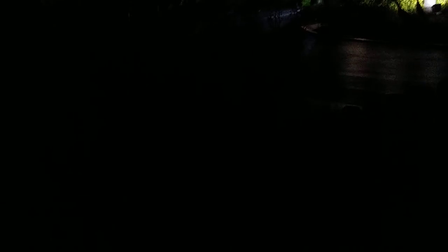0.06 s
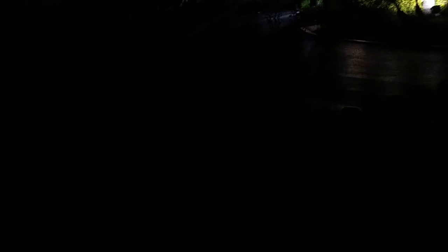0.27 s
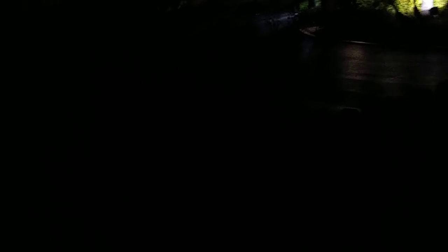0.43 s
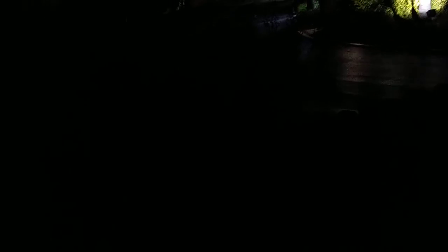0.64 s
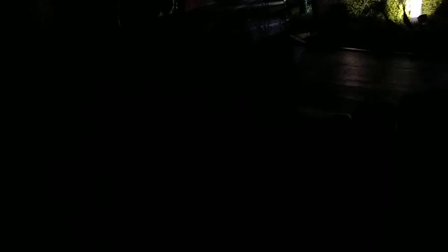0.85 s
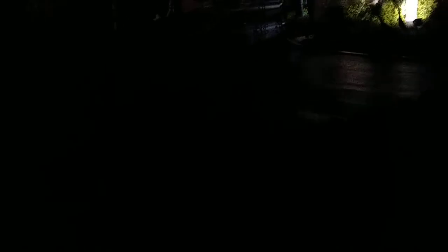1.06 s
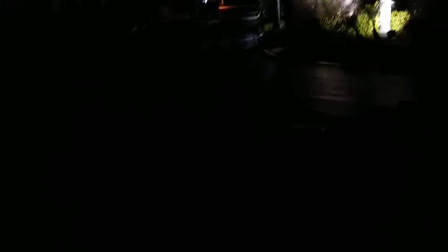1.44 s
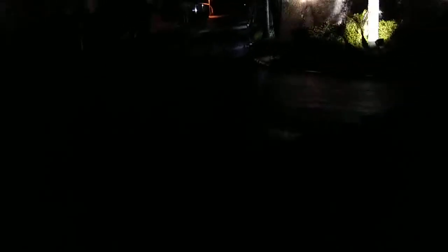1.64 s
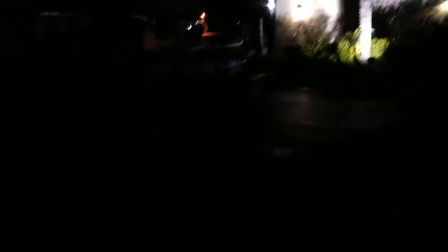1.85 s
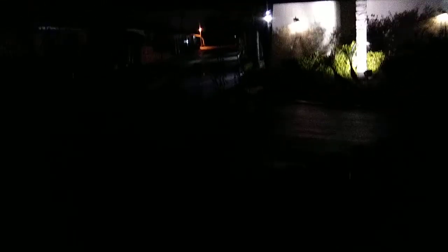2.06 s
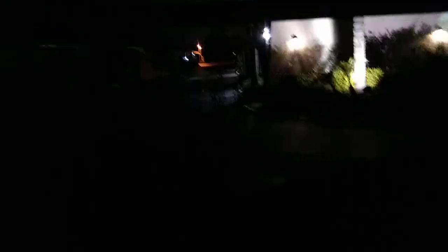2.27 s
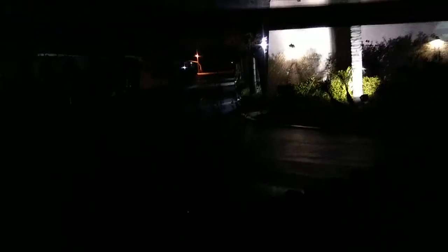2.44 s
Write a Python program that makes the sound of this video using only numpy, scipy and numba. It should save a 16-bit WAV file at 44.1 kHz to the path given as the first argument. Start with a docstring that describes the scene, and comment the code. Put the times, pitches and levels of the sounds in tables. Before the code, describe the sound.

Fighting raccoons let out two rough screeches and a higher, hissing shriek, while softer snarls and a low growl carry on around them. Faint rustling and a short echo sit in quiet night air, ending with brief microphone handling.

```python
"""Two hoarse screeches and a longer, brighter shriek: raccoons fighting outdoors at night. Quieter
snarls and breathy rasps fall around them, over a low pulsing growl. Each cry is uneven vocal-fold pulses
and air ringing the throat and mouth; the growl is slow pulses ringing the chest. Scuffling rustles, and
near the end a hand clicks and rubs the camera. Nearby surfaces add a short echo over faint night air."""
import sys
import numpy as np
from scipy import signal
from scipy.fft import rfft, irfft
from scipy.io import wavfile
from scipy.ndimage import uniform_filter1d
from numba import njit

SR = 44100
rng = np.random.default_rng(int(sys.argv[2]) if len(sys.argv) > 2 else 0)


def generate_wav(signal):
    """Clip the signal to [-1, 1] and save it as 16-bit WAV at the path in sys.argv[1]."""
    frames = np.transpose(np.atleast_2d(signal))
    scaled = np.clip(frames, -1, 1) * 32767
    pcm = np.round(scaled).astype(np.int16)
    wavfile.write(sys.argv[1], SR, pcm)


N = 114660

# upper mouth resonances of snarls and rasps: freq_hz, gain_db
BREATHY_TOP = [(1200, -6.5), (2100, 0.5), (2600, 3), (3500, 3), (4200, -7), (5500, -8), (7500, -33),
               (15500, -43)]


def screeches():
    """Loud, high, hoarse cries, focused on the throat resonance."""
    # one contour per screech: time_s, throat_db, upper_db, throat_hz
    contours = [
        [(.15, -51, -50, 1160), (.178, -41.5, -52, 1303), (.194, -37, -46, 1329), (.201, -30, -42.5, 1349),
         (.23, -31.5, -32.5, 1417), (.244, -29.5, -35, 1449), (.264, -30, -29.5, 1469), (.29, -30.5, -33, 1454),
         (.308, -28, -30.5, 1402), (.338, -34, -48.5, 1250), (.352, -47.5, -58, 1200), (.39, -51, -57, 1190)],
        [(.678, -57, -46, 1431), (.683, -58, -52, 1430), (.688, -29, -38.5, 1417), (.698, -34, -55, 1405),
         (.706, -29.5, -31, 1409), (.731, -24, -34, 1453), (.745, -35, -37, 1458), (.752, -26, -29.5, 1477),
         (.776, -26, -34.5, 1502), (.791, -22.5, -26.5, 1495), (.806, -23.5, -34.5, 1436),
         (.83, -31, -51, 1372), (.86, -57, -44, 1283)],
    ]
    # mouth EQ, body and top: freq_hz, gain_db
    body = [(200, -42), (480, -31), (750, -5.5), (920, -11), (1080, -4), (1230, -10.5), (1450, -1),
            (1680, -1), (1850, -4.5), (2200, -8.5), (2600, -20.5), (4000, -50)]
    top = [(1200, -40), (2100, -3), (2600, 3), (2900, -2), (3200, 1.5), (3520, 4), (3900, -2), (4400, -10),
           (5100, -8.5), (5600, -15.5), (6200, -15.5), (8000, -36), (11000, -37), (15500, -42)]
    return cry(contours, body, top, pitch_hz=478.2, jitter=.14, air=.85, rattle_hz=60.7, rattle_db=1.5,
               width_hz=330, ring_db=-4.5, body_db=2, upper_db=1.3, palate_db=-5)


def shriek():
    """Higher and brighter, mouth wide open; the throat resonance arches up and sinks as it closes."""
    # time_s, throat_db, upper_db, throat_hz
    contour = [(1.645, -65, -71, 1449), (1.66, -45, -42.5, 1451), (1.673, -33.5, -31.5, 1447),
               (1.681, -37, -20.5, 1447), (1.692, -25, -21, 1447), (1.701, -32.5, -35, 1448),
               (1.712, -26, -31, 1431), (1.738, -33, -25, 1501), (1.76, -32.5, -33.5, 1665),
               (1.805, -31, -28, 1677), (1.86, -28.5, -23, 1558), (1.898, -26.5, -20, 1505),
               (1.91, -26, -26, 1402), (1.932, -28, -31, 1299), (1.956, -35, -49, 1197),
               (1.98, -45, -61, 1148)]
    # mouth EQ, body and top: freq_hz, gain_db
    body = [(200, -32), (600, -21.5), (900, -13.5), (1150, -7), (1450, -7.5), (1900, 8.5), (2300, -11),
            (2700, -13), (4000, -45.5)]
    top = [(1200, -28), (2150, -4.5), (2600, 4), (2830, -2.5), (3150, 2), (3500, 1), (3950, -2),
           (4400, -14), (5000, -14.5), (5700, -20.5), (6500, -39), (8500, -28), (12000, -35.5),
           (15500, -55)]
    return cry([contour], body, top, pitch_hz=598.6, jitter=.16, air=.87, rattle_hz=70, rattle_db=0,
               width_hz=580, ring_db=-2, body_db=3, upper_db=3, palate_db=-4)


def rasps():
    """Mostly air through a broad throat resonance, rough and spitting."""
    # one contour per rasp: time_s, throat_db, upper_db, throat_hz
    contours = [
        [(0.0, -35.5, -39, 1373), (0.03, -45.5, -50, 1429), (0.048, -46, -48.5, 1426),
         (0.054, -50, -51.5, 1413), (0.078, -40, -47, 1359), (0.104, -40.5, -46, 1301), (0.128, -48, -52, 1182),
         (0.136, -50, -48, 1130), (0.15, -50, -53, 1103)],
        [(0.83, -37.5, -56, 1271), (0.878, -41, -43.5, 1167), (0.902, -38, -37, 1183), (0.94, -37, -35.5, 1302),
         (0.954, -47, -47, 1259), (0.99, -46.5, -37, 1293), (1.022, -48, -44.5, 1319), (1.08, -44, -41.5, 1290),
         (1.115, -33.5, -35.5, 1259), (1.148, -31.5, -32.5, 1230), (1.172, -44.5, -45.5, 1160),
         (1.2, -42.5, -42.5, 1312), (1.25, -63, -62, 1287)],
    ]
    # mouth EQ: freq_hz, gain_db
    body = [(200, -24), (480, -5), (720, 1), (900, -1.5), (1100, -5.5), (1450, 2.5), (2200, -4),
            (2700, -19), (4000, -34.5)]
    return cry(contours, body, BREATHY_TOP, pitch_hz=188.7, jitter=.3, air=2.8, rattle_hz=65,
               rattle_db=1.4, width_hz=900, ring_db=-5.5, body_db=1, upper_db=0, palate_db=-14)


def snarls():
    """Quieter, lower cries with the mouth half shut."""
    # one contour per snarl: time_s, throat_db, upper_db, throat_hz
    contours = [
        [(0.4, -53, -61, 825.7), (0.452, -39, -56, 853.2), (0.486, -38.5, -46.5, 870),
         (0.524, -36.5, -55, 833.6), (0.592, -35, -56.5, 787.1), (0.66, -48.5, -39, 775.8),
         (0.678, -41.5, -57, 892.5), (0.69, -45, -44, 912.7)],
        [(1.24, -60, -59, 705.4), (1.286, -46.5, -49.5, 721.3), (1.344, -51.5, -47.5, 712.4),
         (1.422, -40, -57.5, 770), (1.458, -48, -53, 738.4), (1.464, -48, -67, 742.6),
         (1.476, -43.5, -64.5, 725.6), (1.58, -64, -65, 758.3)],
        [(1.96, -42, -44, 1047), (2.066, -39, -50, 1060), (2.112, -39, -47, 984.7), (2.142, -42.5, -48.5, 1011),
         (2.216, -34.5, -46.5, 1039), (2.254, -43, -54, 956.8), (2.28, -56, -60, 853.8),
         (2.29, -61, -45, 861.5)],
        [(2.32, -46, -47, 751), (2.366, -44.5, -40, 756.5), (2.4, -41.5, -49, 746.4), (2.424, -42, -43, 751),
         (2.432, -39, -60, 764.4), (2.45, -39, -48.5, 786), (2.504, -41.5, -57, 777.8), (2.59, -62, -47, 745.2)],
    ]
    # mouth EQ: freq_hz, gain_db
    body = [(150, -18), (400, -5.5), (700, -1.5), (1000, -4), (1250, -3.5), (1550, 2), (1900, -6.5),
            (2600, -20.5), (4000, -40)]
    return cry(contours, body, BREATHY_TOP, pitch_hz=150.6, jitter=.3, air=2.8, rattle_hz=52.2,
               rattle_db=1.1, width_hz=400, ring_db=-3.5, body_db=-.3, upper_db=2.2, palate_db=-14)


def cry(contours, body, top, pitch_hz, jitter, air, rattle_hz, rattle_db,
        width_hz, ring_db, body_db, upper_db, palate_db):
    """Pulses and air, shaken by a rattle, ring the moving throat and palate and the fixed mouth EQ."""
    throat_gain, upper_gain, throat_hz = effort(contours)
    pulses, puffs = vocal_folds(pitch_hz * throat_hz / np.mean(throat_hz), jitter)
    rattle = np.sin(phase_of(rattle_hz * np.exp(.27 * wander(43))))
    source = (pulses + air * puffs) * undb(rattle_db * rattle)
    ring = cavity(source, throat_hz, width_hz)
    # the palate resonance loosely follows the throat
    throat_ratio = throat_hz / np.average(throat_hz, weights=upper_gain)
    palate_hz = 3400 * throat_ratio ** .3 * (1 + .025 * wander(30))
    edge = cavity(source, palate_hz, width_hz=520)
    bright = unit(unit(eq(source, top)) + undb(palate_db) * edge)
    core = undb(ring_db) * ring + undb(body_db) * unit(eq(source, body))
    return throat_gain * core + upper_gain * undb(upper_db) * bright


def effort(contours, fade_s=.0041):
    """Throat gain, upper gain and throat resonance through a series of cries."""
    t = np.arange(N) / SR
    throat_gain = upper_gain = 0
    for rows in contours:
        gate = np.clip(.5 + np.minimum(t - rows[0][0], rows[-1][0] - t) / fade_s, 0, 1)
        throat_gain += gate * undb(curve(rows, column=1))
        upper_gain += gate * undb(curve(rows, column=2))
    all_rows = sorted(row for rows in contours for row in rows)
    return throat_gain, upper_gain, curve(all_rows, column=3)


def vocal_folds(hz, jitter, scatter_db=3):
    """Uneven pulses of the folds, and the puff of air that dies away after each."""
    cycles = np.cumsum(hz * np.exp(jitter * wander(np.mean(hz)))) / SR
    pulses = np.diff(np.floor(cycles), prepend=0) * undb(scatter_db * rng.standard_normal(N))
    puffs = np.exp(-(cycles % 1)) * rng.standard_normal(N)
    return unit(pulses), unit(puffs)


def cavity(x, hz, width_hz):
    """A moving vocal resonance: two band-passes in series."""
    return unit(bandpass(bandpass(x, hz, width_hz), hz, width_hz))


def squeals():
    """Nearly pure tones that break out of the loud cries."""
    # one glide per squeal: time_s, pitch_hz, level_db
    glides = [
        [(.24, 1432, -47), (.25, 1440, -21), (.256, 1462, -30), (.266, 1486, -19.5), (.285, 1460, -27),
         (.305, 1380, -38), (.325, 1250, -52)],
        [(.745, 1440, -50), (.751, 1438, -21), (.764, 1470, -23), (.775, 1595, -25), (.795, 1680, -20.5),
         (.807, 1666, -27), (.818, 1600, -48)],
        [(1.695, 1482, -45), (1.712, 1402, -23.5), (1.73, 1330, -35), (1.755, 1530, -46), (1.785, 1676, -29),
         (1.805, 1752, -34), (1.815, 1750, -50)],
        [(1.815, 1286, -45), (1.835, 1380, -28), (1.86, 1634, -38), (1.895, 1894, -26), (1.92, 1850, -45)],
    ]
    return tones(glides, gain_db=-.5, jitter=.03105, waver_hz=160, flutter_db=4)


def whines():
    """Thin tones held through two of the snarls."""
    # one glide per whine: time_s, pitch_hz, level_db
    glides = [
        [(.44, 849, -59.5), (.47, 880, -44), (.515, 869.4, -36.5), (.56, 824, -43), (.595, 826, -42),
         (.64, 790, -51)],
        [(1.258, 700, -62), (1.277, 716, -37), (1.305, 723, -39), (1.335, 712, -45), (1.39, 711.6, -47),
         (1.43, 734, -41.5), (1.48, 737, -38.5), (1.515, 730, -44.5), (1.545, 718.7, -63)],
    ]
    return tones(glides, gain_db=-1.5, jitter=.0349, waver_hz=131, flutter_db=3)


def tones(glides, gain_db, jitter, waver_hz, flutter_db):
    """Gliding sines that waver in pitch and level."""
    t, mix = np.arange(N) / SR, 0
    for rows in glides:
        hz = curve(rows) * (1 + jitter * wander(waver_hz))
        gate = (t > rows[0][0]) * (t < rows[-1][0])
        gain = gate * undb(gain_db + curve(rows, column=2) + flutter_db * wander(86))
        mix += gain * np.sqrt(2) * np.sin(phase_of(hz))
    return mix


def spits(attack_s=.013, flutter_db=2):
    """Air spat through the teeth at the height of a cry: sharp hiss that flutters and ebbs."""
    # start_s, length_s, level_db
    bursts = [(0.242, .085, -31), (0.758, 0.073, -35.5), (1.672, 0.061, -28), (1.772, .05, -35.5),
              (1.867, 0.073, -36)]
    # hiss of the teeth: freq_hz, gain_db
    teeth = [(2500, -35), (3600, -9), (4150, -2), (5100, 0), (6100, -12), (7000, -26), (15500, -32)]
    t, envelope = np.arange(N) / SR, 0
    for start_s, length_s, level_db in bursts:
        attack = np.clip((t - start_s) / attack_s, 0, 1)
        ebb = np.sqrt(np.clip(1 - (t - start_s) / length_s, 0, 1))
        envelope += undb(level_db) * attack * ebb
    return envelope * noise(teeth, swing_db=flutter_db * wander(140))


def growl(direct_db=2, scattered_db=-1, waver_db=3, throb_db=3):
    """Slow throat pulses ring the chest: now a clean hum, now ragged and partly scattered all around."""
    # time_s, pulse_hz
    pulse_rate = [(0, 55.7), (.3, 58.7), (.55, 57), (.9, 60), (1.25, 60.8), (1.5, 60.7), (1.7, 56),
                  (2.1, 57), (2.6, 57)]
    # time_s, level_db
    levels = [(0, -42), (.1, -39.5), (.25, -40), (.4, -39), (.57, -40.5), (.65, -35), (.75, -39.5),
              (1.03, -35), (1.17, -35.5), (1.35, -39), (1.5, -38), (1.66, -40.5), (1.75, -45), (1.95, -46),
              (2.2, -39), (2.6, -41)]
    # time_s, roughness (0-1)
    roughness = [(0, 0.22), (.2, 0.74), (.4, 0), (.55, 0.42), (.7, 0.82), (1.0, 0.56), (1.4, 0.4),
                 (1.65, 0.25), (1.9, 0.67), (2.6, 0.8)]
    # the clean hum: harmonic, level_db
    partials = [(1, -19), (2, -0.5), (3, -1.5), (4, -12.5), (5, -11), (6, -15)]
    # lean toward the harmonics above the second: time_s, tilt_db
    tilt = [(0, 0), (.4, -1), (1.15, 1), (1.45, 8), (1.6, 3), (1.75, -3)]
    # chest resonances: freq_hz, gain_db
    chest = [(30, -45), (45, -30), (57, -33), (85, -19), (118, 0), (150, -1.5), (200, 1), (240, -6.5),
             (295, -2.5), (400, -12), (520, -14.5), (800, -18), (1500, -47), (4000, -73)]
    phase = phase_of(curve(pulse_rate) * (1 + .00847 * wander(14.5)))
    hum = 0
    for harmonic, level_db in partials:
        tilt_db = curve(tilt) * (.5 if harmonic > 2 else -.5)
        gain = undb(level_db + tilt_db + waver_db * wander(12.4))
        hum += gain * np.sin(harmonic * phase + rng.uniform(0, 2 * np.pi))
    rough, level = curve(roughness), undb(curve(levels))
    ragged = np.sqrt(rough) * np.array([noise(chest, throb_db * np.sin(phase)) for _ in range(3)])
    direct = undb(direct_db) * (np.sqrt(1 - rough) * unit(hum) + ragged[0])
    return widen(level * direct) + undb(scattered_db) * level * ragged[1:]


def rustle():
    """Grainy rustling, plus a burst of spitting hiss as the shriek starts."""
    # time_s, level_db
    levels = [(0, -69), (.15, -60), (.55, -70), (.65, -52), (.72, -64), (.89, -61), (.93, -47.5),
              (.97, -49.5), (1.0, -44), (1.08, -49), (1.25, -67), (1.46, -67), (1.66, -74), (1.677, -42),
              (1.70, -44), (1.74, -42.5), (1.78, -46), (1.9, -56), (2.0, -65), (2.6, -70)]
    # freq_hz, gain_db
    tone = [(500, -15), (3000, 10), (6000, -1.5), (10000, -2), (13000, 2), (15500, -4)]
    return grainy_noise(levels, tone, grain_db=3)


def handling(click_s=2.3062, click_gain_db=-7.5, decay_s=.00069, pan_db=4.5):
    """A finger clicks on the camera body, then slides, louder on the left."""
    # the slide: time_s, level_db
    rub_levels = [(2.3, -60.5), (2.31, -38.5), (2.36, -36.5), (2.395, -45), (2.46, -53.5), (2.51, -40.5),
                  (2.56, -42.5), (2.6, -36)]
    # EQ of slide and click: freq_hz, gain_db
    rub_tone = [(150, 8), (500, 9.5), (1200, 0.5), (2200, -8.5), (3500, 1.5), (6000, 0.5), (8000, -6.5),
                (11000, -9.5), (15500, -25)]
    click_tone = [(100, -18), (500, 11.5), (1300, 7.5), (2200, -24), (5000, -13), (15500, -41)]
    age = np.arange(N) / SR - click_s
    push = (age >= 0) * np.exp(-np.abs(age) / decay_s)
    click = undb(click_gain_db) * eq(2 * np.diff(push, prepend=0), click_tone)
    pan = undb([[pan_db / 2], [-pan_db / 2]])
    return click + pan * grainy_noise(rub_levels, rub_tone, grain_db=2)


def grainy_noise(levels, tone, grain_db):
    """Noise with a fast flicker in level, independent left and right."""
    return np.array([noise(tone, grain_db * wander(470)) for _ in range(2)]) * undb(curve(levels))


def near_reflection(x, delay_s=.00308, gain_db=-17.5):
    """A surface close to the camera adds one quick reflection."""
    delay = np.exp(-2j * np.pi * np.fft.rfftfreq(N, 1 / SR) * delay_s)
    return x + undb(gain_db) * irfft(rfft(x) * delay, N)


def wall_echo(x, t60_s=.13, gain_db=-12.5, predelay_s=.004):
    """A short diffuse echo from house fronts and ground."""
    t = np.arange(SR // 2) / SR
    tails = rng.standard_normal((2, len(t))) * undb(-60 * t / t60_s) * (t > predelay_s)
    echoes = [signal.fftconvolve(x, tail / np.linalg.norm(tail))[:N] for tail in tails]
    return undb(gain_db) * np.array(echoes)


def widen(x, lag_s=.000454):
    """The camera's stereo widening delays the left channel and shifts phase and balance in each band."""
    # left relative to right, on top of the lag: freq_hz, phase_rad, balance_db
    bands = [(101, -2, 4), (190, -0.25, -4), (358, -1, -11), (420, -0.1, -1.5), (526, 2, 1), (615, 2.5, 6),
             (830, 2.5, 1.5), (1120, 3.5, 0), (1332, 5, -6.5), (1521, 6, -10.5), (1633, 9, -3.5),
             (1876, 8.5, 4.5), (2440, 9.5, -1.5), (2620, 9.4, -15), (2930, 9.5, 0), (3100, 8, -2.5),
             (3500, 8.5, 1.5), (3950, 9.5, -4), (4130, 9, -5), (4440, 8.5, -1), (5200, 10, -2),
             (5550, 11, 0), (6030, 10, 2), (6550, 7.5, 1), (15500, 10, -1)]
    lag_rad = 2 * np.pi * np.fft.rfftfreq(N, 1 / SR) * lag_s
    turn = np.exp(.5j * (on_bins(bands) - lag_rad))
    half_db = on_bins(bands, column=2) / 2
    left, right = undb(half_db), undb(-half_db)
    spectrum = rfft(x) / np.sqrt((left ** 2 + right ** 2) / 2)
    return np.array([irfft(spectrum * left * turn, N), irfft(spectrum * right / turn, N)])


def night_air(level_db=-47, drift_db=.51):
    """A faint, low outdoor bed that drifts slowly in level."""
    # freq_hz, gain_db
    tone = [(25, -24), (40, -21), (54, 3), (68, -4.5), (120, 5), (300, 2), (700, -7.5), (1500, -15),
            (3000, -25.5), (6000, -53), (15500, -40.5)]
    return np.array([noise(tone) for _ in range(2)]) * undb(level_db + drift_db * wander(2.1))


def undb(db):
    """Decibels to gain."""
    return 10 ** (np.asarray(db) / 20)


def unit(x):
    """Scale to rms 1."""
    return x / np.sqrt(np.mean(x ** 2) + 1e-18)


def phase_of(hz):
    """Running phase in radians."""
    return 2 * np.pi * np.cumsum(hz) / SR


def curve(rows, column=1):
    """One column of a table, joined by straight lines in time."""
    rows = np.array(rows)
    return np.interp(np.arange(N) / SR, rows[:, 0], rows[:, column])


def on_bins(rows, column=1):
    """One column of a table, joined on a log-frequency axis."""
    rows = np.array(rows)
    return np.interp(np.log(np.fft.rfftfreq(N, 1 / SR) + 1), np.log(rows[:, 0]), rows[:, column])


def eq(x, tone):
    """Filter by a table of freq_hz, gain_db."""
    return irfft(rfft(x) * undb(on_bins(tone)), N)


def noise(tone, swing_db=0):
    """Noise, modulated in level and then filtered, at rms 1."""
    return unit(eq(rng.standard_normal(N) * undb(swing_db), tone))


def wander(rate_hz):
    """Smooth random motion at rms 1."""
    span = max(int(SR / rate_hz), 1)
    return unit(uniform_filter1d(uniform_filter1d(rng.standard_normal(N), span), span))


@njit
def bandpass(x, hz, width_hz):
    """State-variable band-pass with a moving centre."""
    y, band_state, low_state = np.empty(len(x)), 0., 0.
    for i in range(len(x)):
        g, damping = np.tan(np.pi * hz[i] / SR), width_hz / hz[i]
        band = (band_state + g * (x[i] - low_state)) / (1 + g * (g + damping))
        band_state = 2 * band - band_state
        low_state += 2 * g * band
        y[i] = damping * band
    return y


def scene():
    """The cries and their echo, over the growl, the rustle, the hand and the night."""
    tonal = squeals() + whines()
    hoarse = screeches() + shriek() + rasps() + snarls() + spits()
    cries = near_reflection(hoarse) + tonal
    return widen(cries) + wall_echo(cries) + growl() + rustle() + handling() + night_air()


def record(dry, low_cut_hz=51, high_cut_hz=15450):
    """The camera cuts the deepest bass and the top."""
    thin = signal.sosfilt(signal.butter(3, low_cut_hz, "high", fs=SR, output="sos"), dry)
    return signal.sosfilt(signal.ellip(10, .2, 80, high_cut_hz, fs=SR, output="sos"), thin)


dry = scene()
out = record(dry)
generate_wav(out)
```